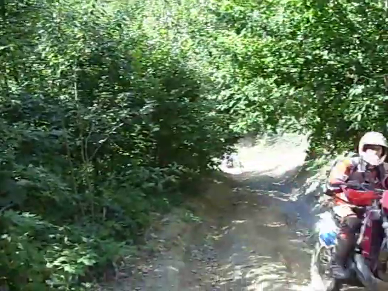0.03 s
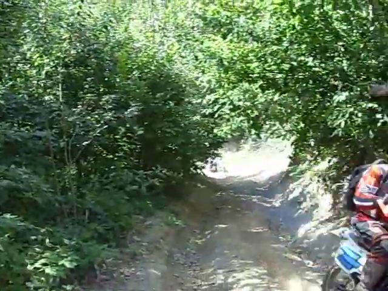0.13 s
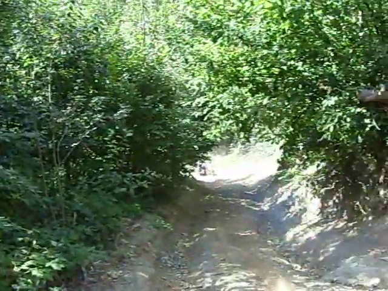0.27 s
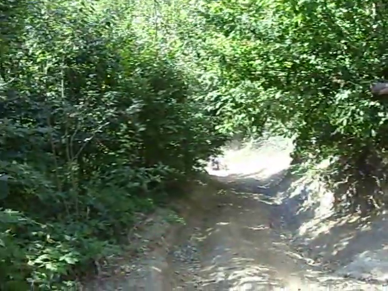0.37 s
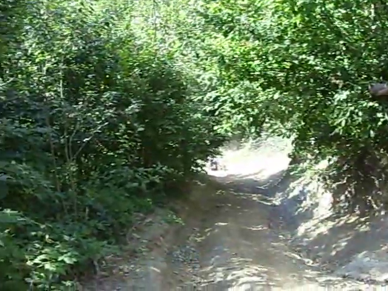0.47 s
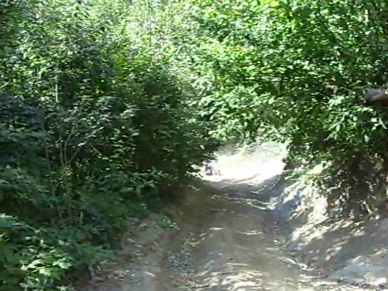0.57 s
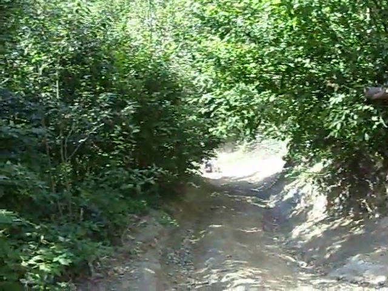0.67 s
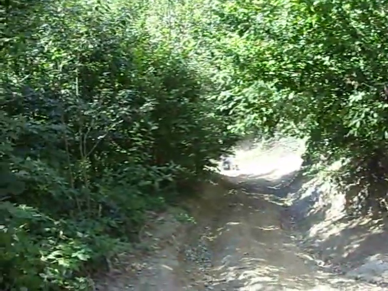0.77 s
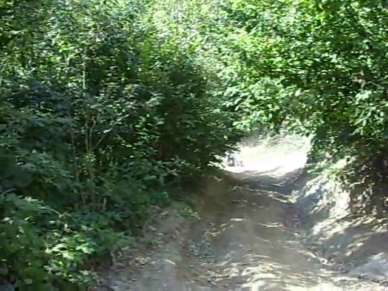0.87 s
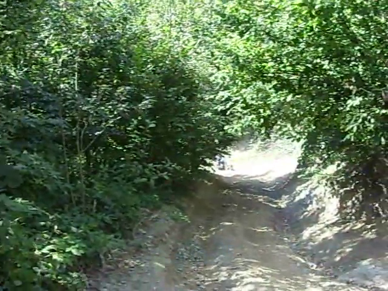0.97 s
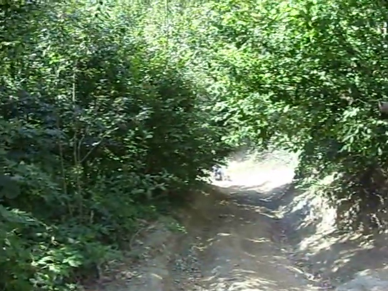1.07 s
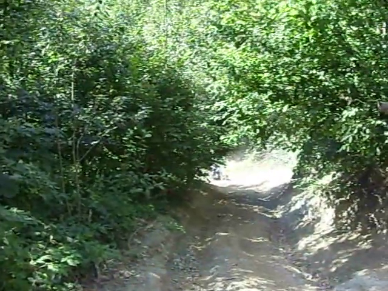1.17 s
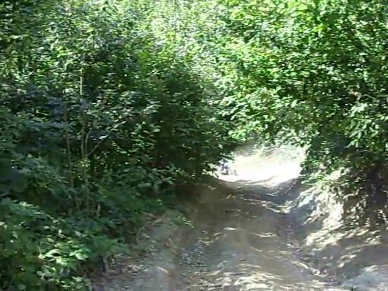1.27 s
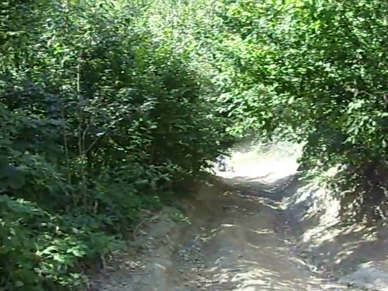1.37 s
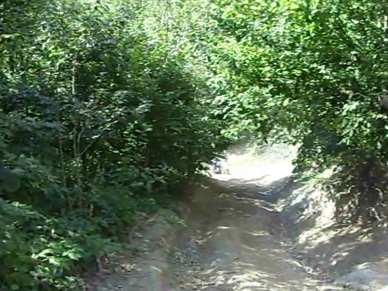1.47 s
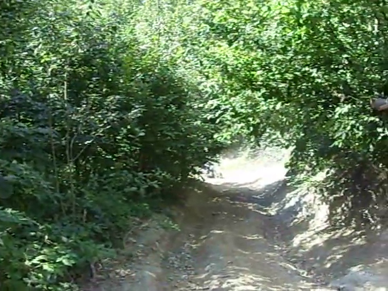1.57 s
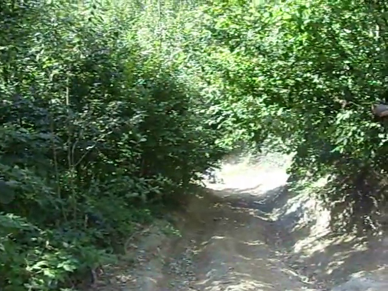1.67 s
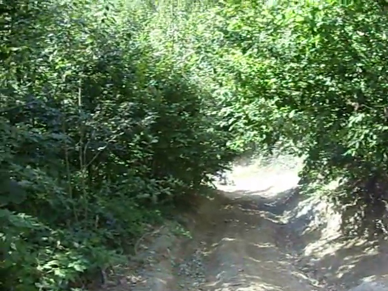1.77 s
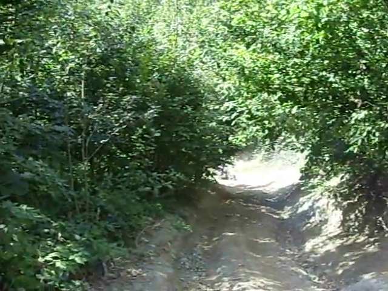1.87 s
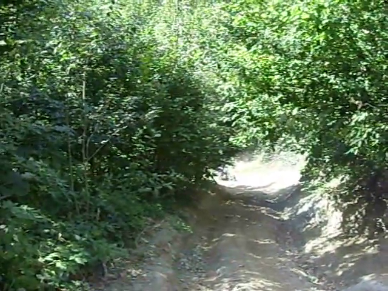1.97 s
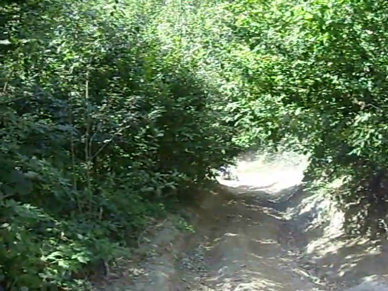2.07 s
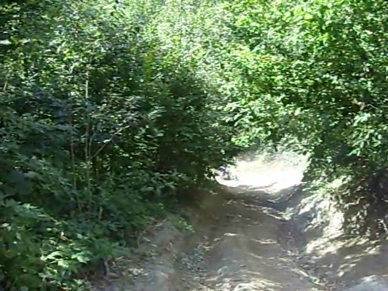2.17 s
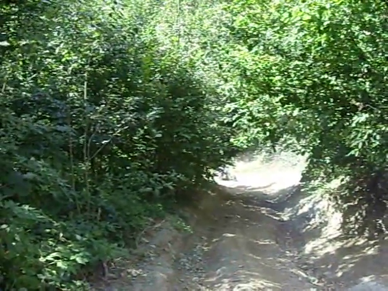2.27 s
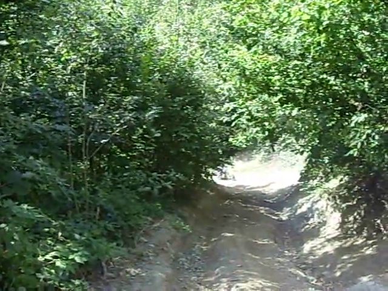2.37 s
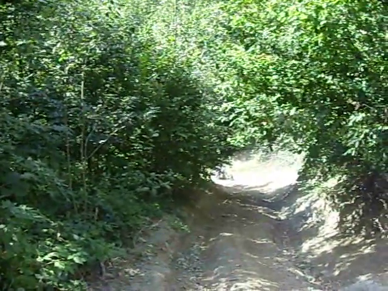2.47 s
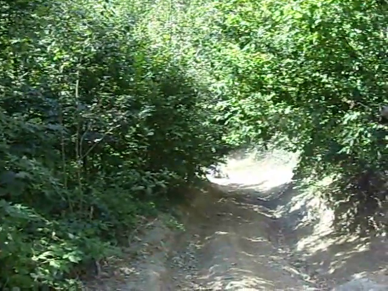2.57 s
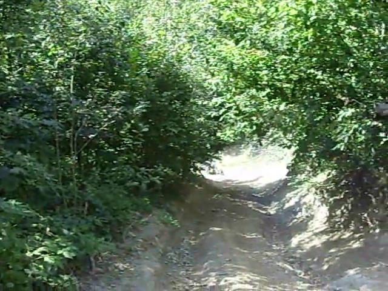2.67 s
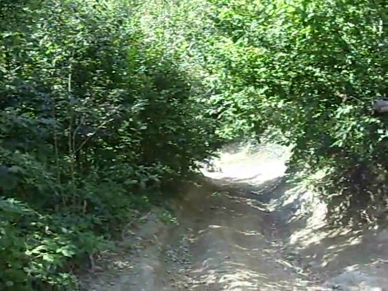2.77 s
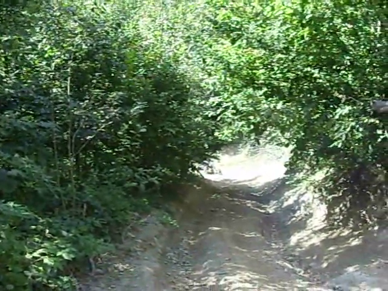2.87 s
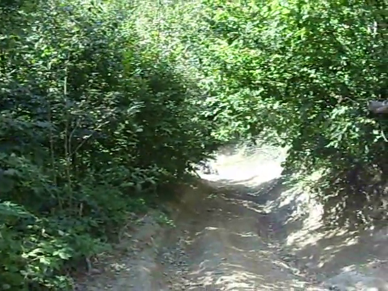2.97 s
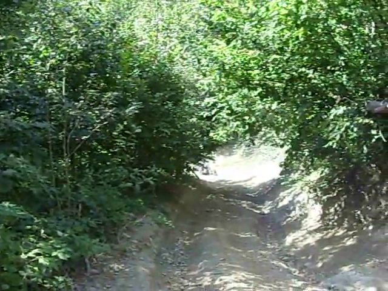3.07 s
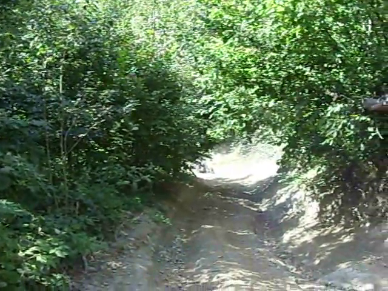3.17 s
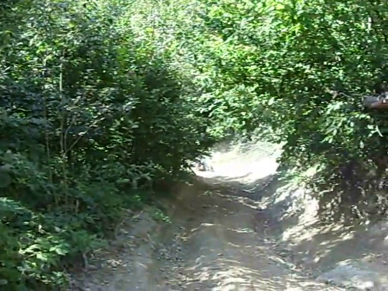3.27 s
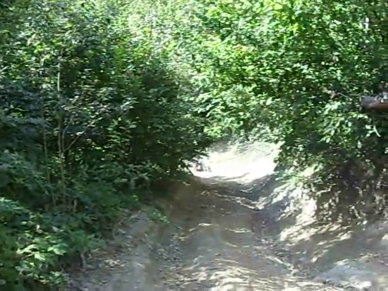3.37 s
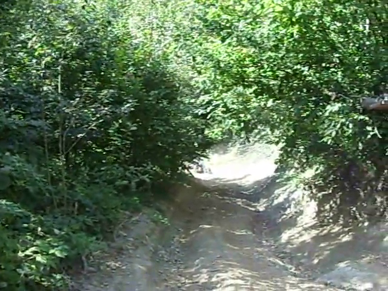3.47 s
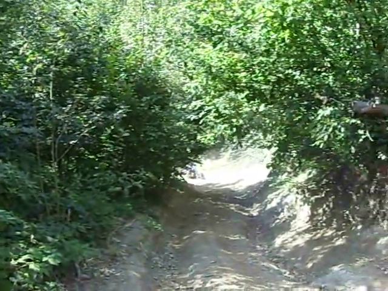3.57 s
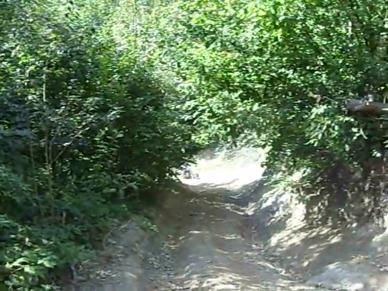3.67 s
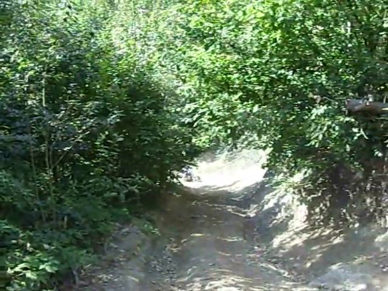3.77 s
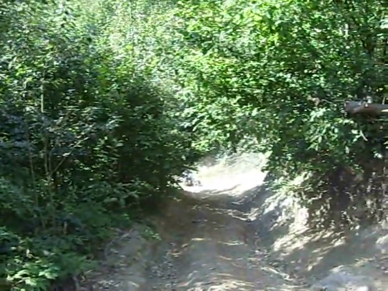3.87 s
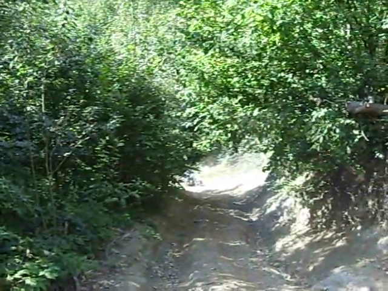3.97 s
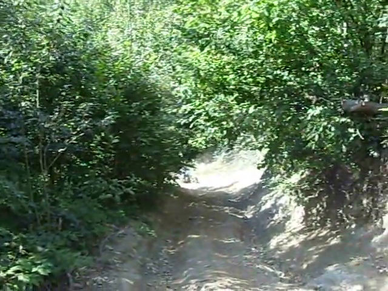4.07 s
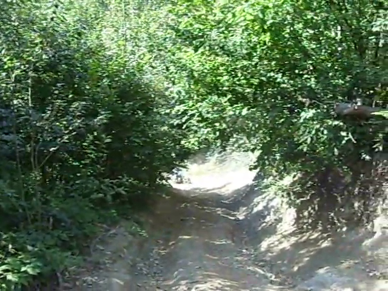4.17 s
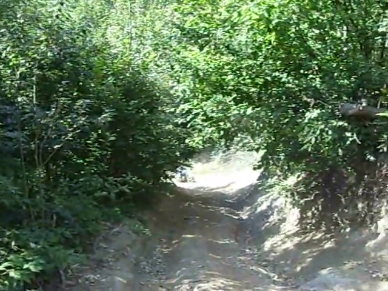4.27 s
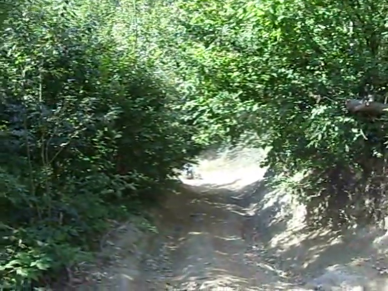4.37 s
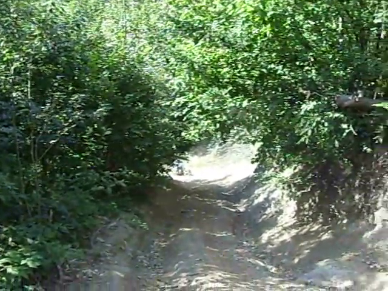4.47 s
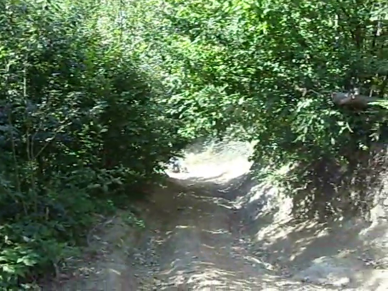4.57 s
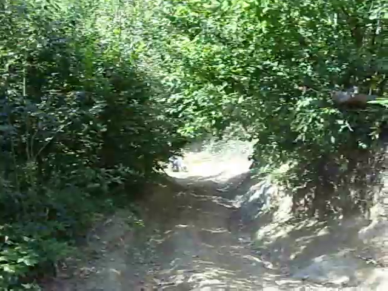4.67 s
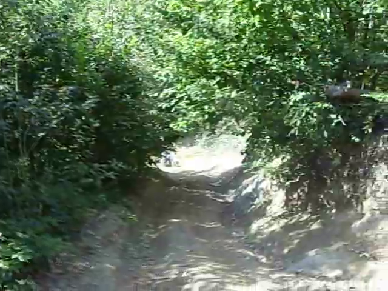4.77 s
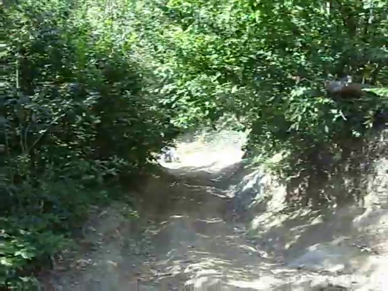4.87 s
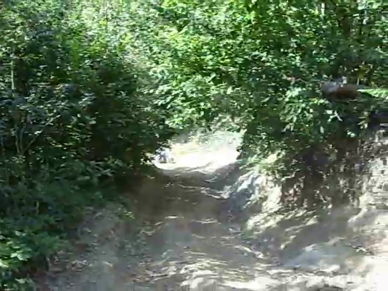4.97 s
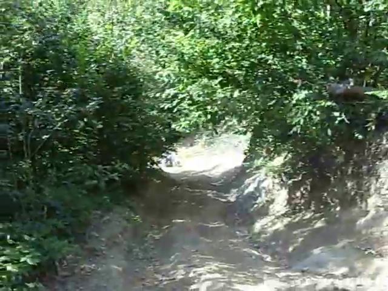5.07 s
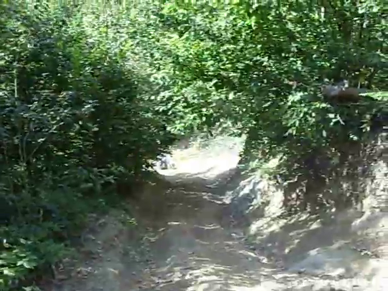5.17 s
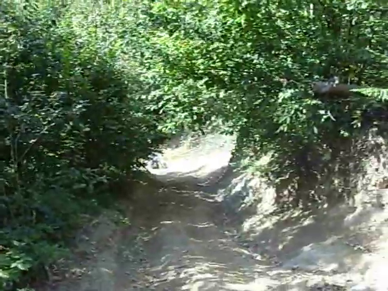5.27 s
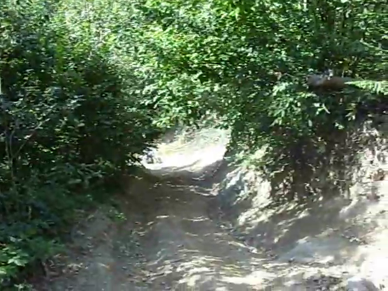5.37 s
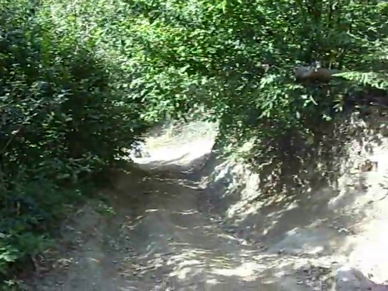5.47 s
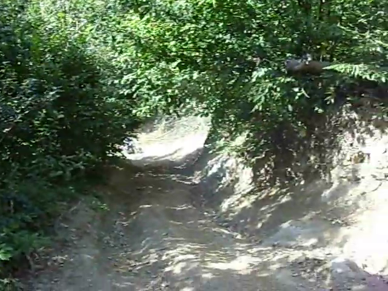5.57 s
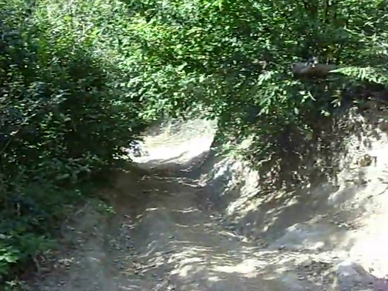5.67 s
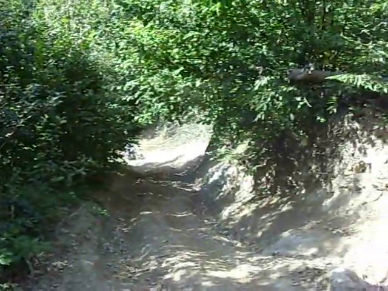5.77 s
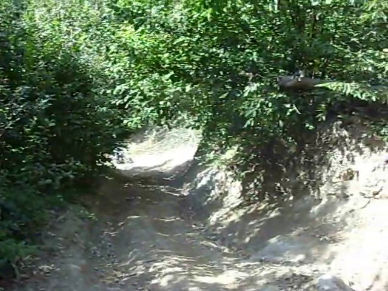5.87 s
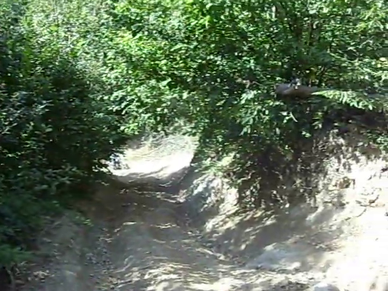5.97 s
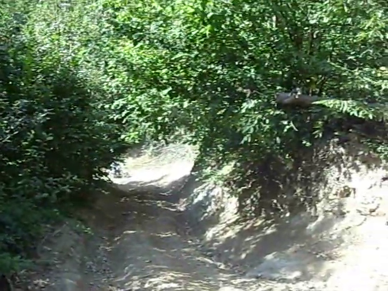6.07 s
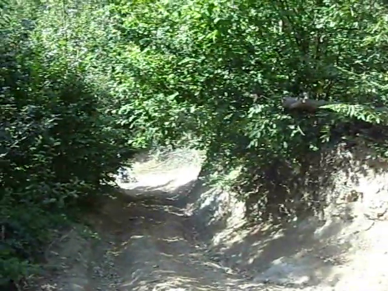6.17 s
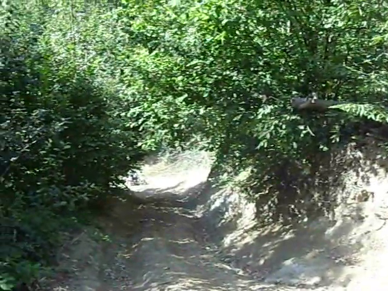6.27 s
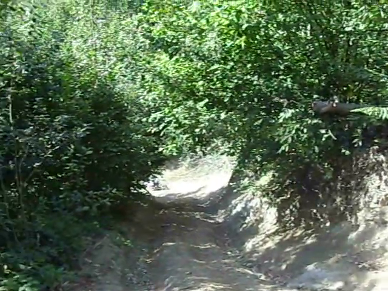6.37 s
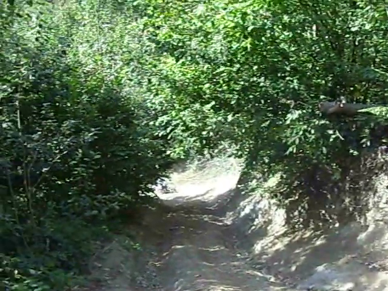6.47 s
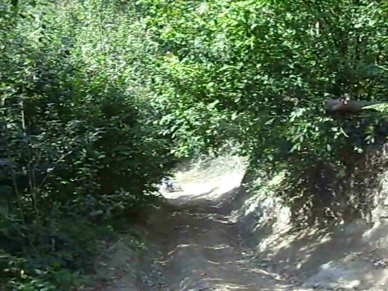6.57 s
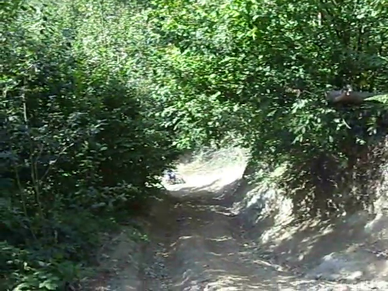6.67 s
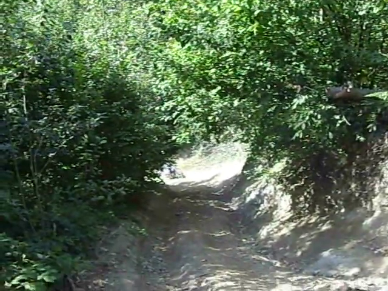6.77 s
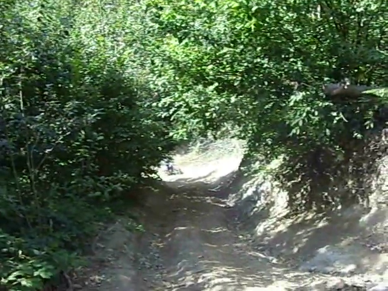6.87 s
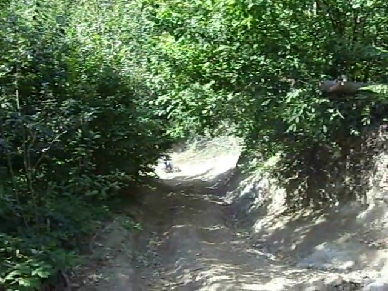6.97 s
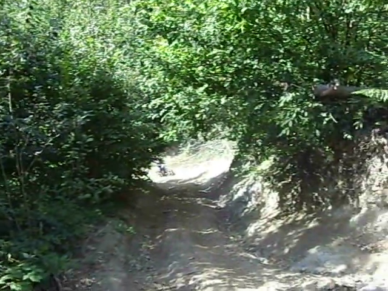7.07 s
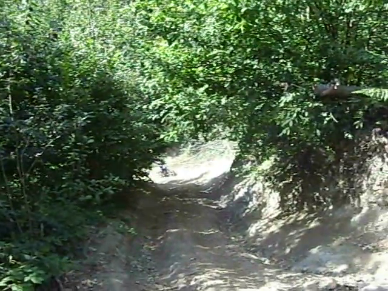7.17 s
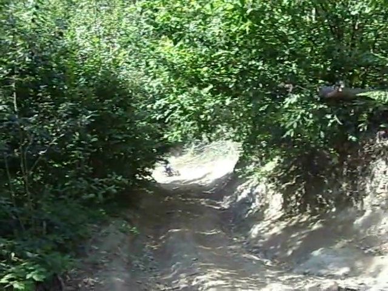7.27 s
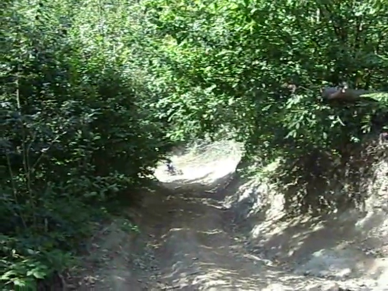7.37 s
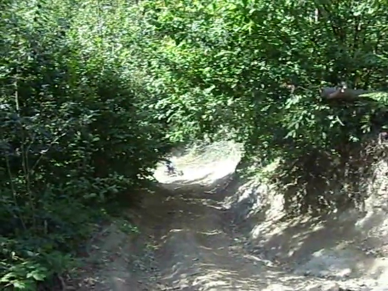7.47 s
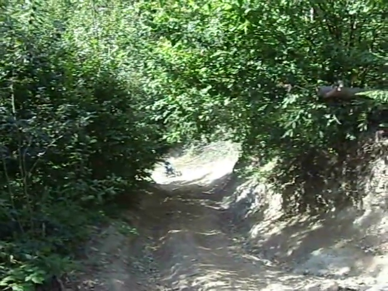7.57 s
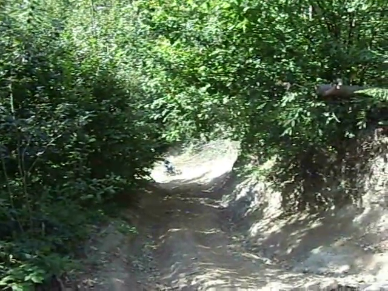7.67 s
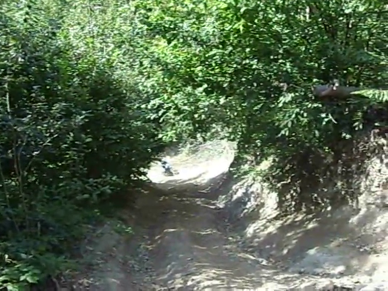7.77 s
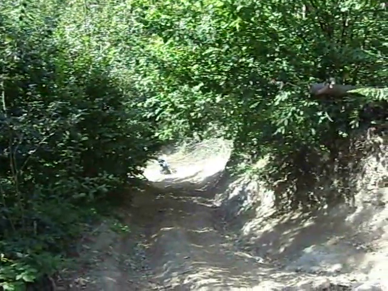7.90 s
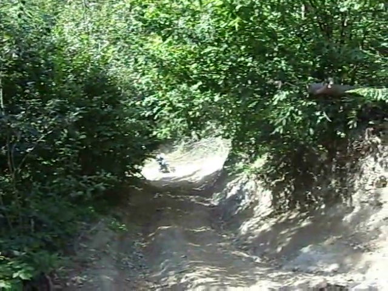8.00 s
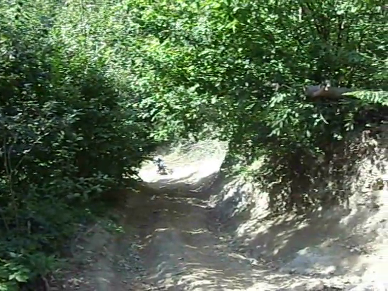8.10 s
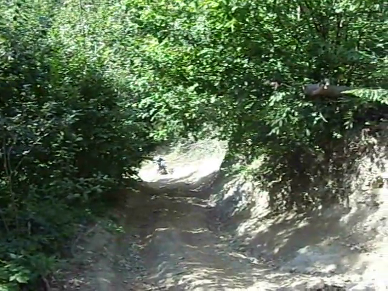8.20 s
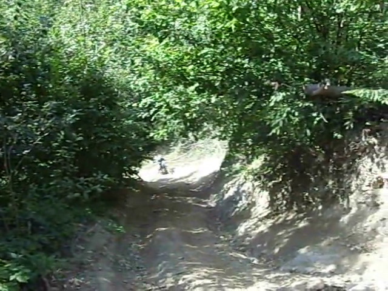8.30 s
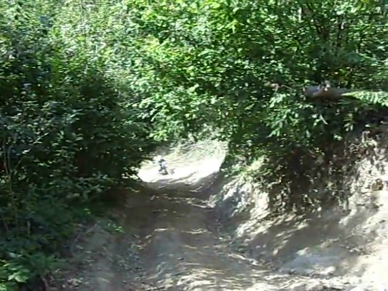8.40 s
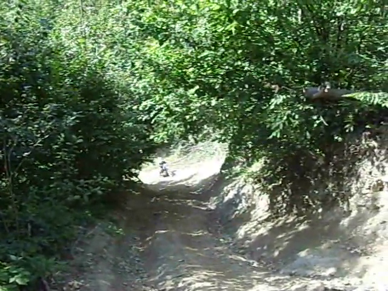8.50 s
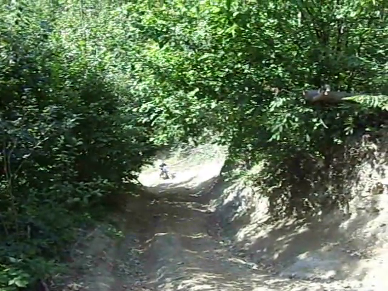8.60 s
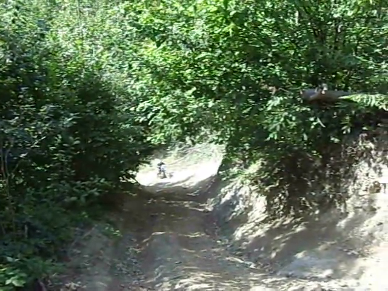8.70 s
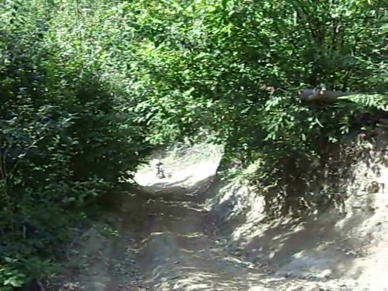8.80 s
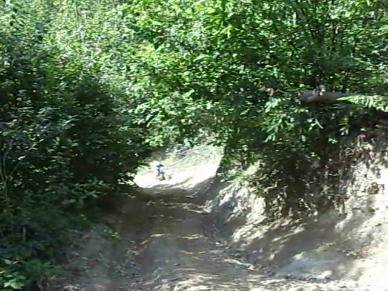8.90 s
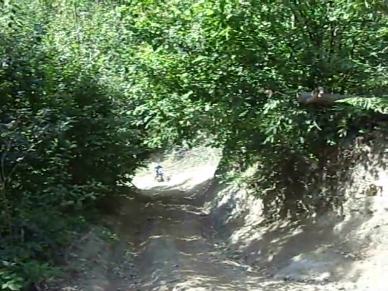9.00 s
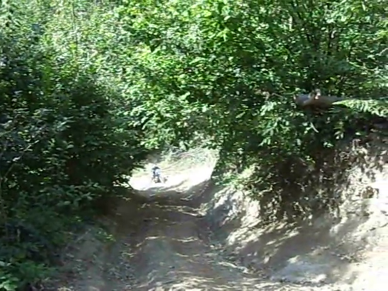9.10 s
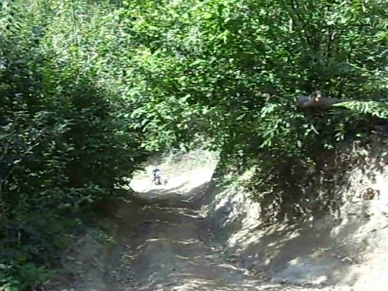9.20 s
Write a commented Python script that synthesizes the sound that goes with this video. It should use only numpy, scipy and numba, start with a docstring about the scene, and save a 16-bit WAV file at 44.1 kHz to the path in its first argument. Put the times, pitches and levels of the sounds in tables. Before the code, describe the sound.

A dirt bike roars past close, pops and putters away, then a second bike labours up the forest trail and drops to a lumpy idle.

```python
"""A single-cylinder dirt bike passes close on a wooded trail, shuts the throttle briefly, pulls away,
then coasts, pops and putters off. A second bike labours up from far away and drops to a lumpy idle.
Each firing of an engine makes the exhaust pipe ring and lets out a rasp of gas; trees scatter the sound.
Three dry clicks and a soft forest murmur join in, and the loudest peaks overload a small microphone."""
import sys
import numpy as np
from scipy import signal
from scipy.fft import rfft, irfft
from scipy.io import wavfile
from scipy.ndimage import uniform_filter1d
from numba import njit

SR = 44100
rng = np.random.default_rng(int(sys.argv[2]) if len(sys.argv) > 2 else 0)


def generate_wav(sig):
    """Save sig (samples, or channels by samples) to the path in sys.argv[1] as 16-bit PCM at SR."""
    pcm = np.round(np.clip(np.atleast_2d(sig).T, -1, 1) * 32767).astype(np.int16)
    wavfile.write(sys.argv[1], SR, pcm)


N = 407484
T = np.arange(N) / SR
COAST_S = 1.95  # about when the first bike starts to coast

# the first bike's twists of the throttle: (opens [s], shuts [s], opening [0-1])
FIRST_THROTTLE = [(-.2, .25, .87), (.25, .415, 1), (.575, 1.15, 1), (1.15, 1.4, .72), (1.4, 1.875, .82),
                  (3.78, 3.98, 1), (4.16, 5.2, .8)]
# tone of its gas rasp from behind: (pitch [Hz], level [dB])
RASP_FROM_BEHIND = [(760, -26), (1300, -44), (1340, -9), (1500, -17), (1590, -4.5), (1710, -3.5),
                    (1870, 0.5), (2420, -5), (2620, -9.5), (3550, 1), (3900, -6.5), (4390, -14.5),
                    (5160, -16.5), (5730, -22.5), (7450, -76.5), (12600, -120)]
# how its pipe rings at light throttle: (pitch [Hz], width [Hz], level [dB])
LIGHT_PIPE_RINGS = [(101, 29, 0.5), (272, 60, -6), (373, 24.4, 2.5), (606, 140, -12), (1000, 270, -36)]
# how the second bike's pipe rings at idle: (pitch [Hz], width [Hz], level [dB])
IDLE_PIPE_RINGS = [(112, 13, 7), (184, 21, 0.5), (283, 33, -2.5), (520, 79, -4), (768, 93, -12),
                   (1090, 265, -17)]
# the bright ring of its tailpipe: (pitch [Hz], width [Hz], level [dB])
TAILPIPE_RINGS = [(1710, 2240, -14.5), (2018, 150, 2.5), (2534, 110, -6.5), (3184, 270, -5.5),
                  (3640, 360, -10.5), (4270, 1500, -14.5)]
# tone of the hiss from chain and tyres: (pitch [Hz], level [dB])
HISS_TONE = [(710, -15), (1200, -49), (1440, -13), (1650, 2), (1950, 1.5), (2230, 1.5), (2530, -1),
             (3240, 3), (5030, -8.5), (5730, -12.5), (7450, -97), (12600, -120)]


def passing_bike():
    """The first bike rides by in a straight line, heard from the side and then from behind."""
    # engine speed while passing, then coasting: (time [s], firings per second [Hz])
    pass_rate = [(0.0, 83.6), (0.104, 79.9), (0.234, 80.3), (0.328, 84.8), (0.424, 83.7), (0.486, 67.8),
                 (0.57, 59.2), (0.638, 66.2), (0.696, 69.2), (0.852, 75.2), (0.936, 74.8), (1.004, 71.5),
                 (1.11, 69.1), (1.172, 71.6), (1.25, 67.5), (1.712, 81.3), (1.88, 77.3)]
    coast_rate = [(2.0, 61), (2.598, 46.1), (2.85, 42.5)]
    closest_s, closest_m, speed_m_s = .52, 2.5, 6.4
    nearness = closest_m / np.hypot(closest_m, speed_m_s * (T - closest_s))
    ground_lag_s = .002733 * nearness  # sound bouncing off the trail arrives this much later
    behind = ramp(.97, 1.81)  # the tailpipe swings round to face the microphone
    shut = 1 - throttle(FIRST_THROTTLE, travel_s=.04)
    coasting = np.clip(2 * shut - 1, 0, 1)
    boom_gain = nearness * undb(-18 - 11.5 * shut - 17.5 * behind)
    bark_gain = nearness * undb(-8.5 - 12.5 * shut - 2.4 * behind)
    rasp_gain = nearness * undb(-14 - 10.5 * shut + 7 * behind)
    fired = firings(np.vstack([pass_rate, coast_rate]), jitter_s=.00006, scatter_db=.9)
    fired = fired * undb(2.5 * coasting * noise())
    pipe = exhaust_note(fired, behind, coasting, ground_lag_s)
    boom = steady(band(pipe, 195, "low"), samples=1500) * np.maximum(boom_gain, undb(-43))
    bark = steady(band(pipe, 195, "high"), samples=1500) * bark_gain * (1 - ramp(2.3, 2.85))
    note = trees((boom + bark) * (1 - ramp(2.7, 2.95)), fade_s=.35, echo_db=-15)
    rasp = exhaust_rasp(fired, behind, coasting, ground_lag_s) * rasp_gain * (1 - ramp(1.837, 2))
    return note + trees(rasp, fade_s=.4, echo_db=-12)


def exhaust_note(fired, behind, coasting, ground_lag_s):
    """Pulses of gas ring the pipe; with the throttle shut, fuel burns unevenly and the note burbles."""
    # tone of the pipe from the side and from behind: (pitch [Hz], level [dB])
    side_tone = [(55, -23.5), (85, -7), (125, 6), (155, 2), (215, -3.5), (340, 1.5), (470, -1), (680, 0),
                 (850, -3.5), (1100, -8.5), (1500, -20), (2200, -44)]
    rear_tone = [(55, -40.5), (78, 31.5), (150, 6), (190, 0), (240, 3.5), (320, 9), (410, 3), (650, 4.5),
                 (950, -1.5), (1120, -4), (1350, -20), (2200, -35)]
    gas = fired + (.22 + .4 * coasting) * puff(fired, decay_s=.008)
    gas = chamber(gas, lag_s=.001321, share=.78)
    gas = chamber(gas, lag_s=.0031, share=.66)
    pipe = (1 - behind) * colour(gas, side_tone) + behind * colour(gas, rear_tone)
    pipe = pipe + .38 * echo(pipe, ground_lag_s)
    honk_hz = np.minimum(1 / ground_lag_s, 562)  # climbs with the ground bounce just after the pass
    honk = resonance(pipe, honk_hz, width_hz=92.) * ramp(.55, 1) * (1 - ramp(.886, 1.46))
    hollow_hz = 370 - 110 * np.clip(T - COAST_S, 0, 1)  # a hollow ring sinks as the bike coasts
    hollow = resonance(pipe, hollow_hz, width_hz=36.) * (ramp(COAST_S, 2.05) - ramp(2.1, 2.55))
    return pipe + undb(9.5) * honk + undb(6.5) * hollow


def exhaust_rasp(fired, behind, coasting, ground_lag_s):
    """Escaping gas steepens into shock waves of uneven strength, sharpest from behind."""
    # tone of the rasp from the side: (pitch [Hz], level [dB])
    side_tone = [(650, -29), (1100, -4.5), (1360, -4), (1850, 2), (2300, 0), (4060, -2), (4760, -7.5),
                 (5310, -6), (5730, -16.5), (7450, -69), (12600, -120)]
    # its bright ring from the front: (pitch [Hz], width [Hz], level [dB])
    front_ring = [(3230, 3100, 2.5)]
    shock = fired * undb(noise())
    alternating = (-1) ** np.cumsum(fired != 0)  # heard from behind, every second firing is stronger
    shock = shock * undb(1.8 * behind * alternating)
    blast = (.67 + .5 * behind) * shock + behind * puff(shock, decay_s=.0022)
    blast = blast + (1 - behind / 2) * puff(shock, decay_s=.0077) + .78 * puff(fired, decay_s=.0088)
    blast = (1 - coasting) * blast + coasting * puff(fired, decay_s=.02)
    blast = blast + .3 * echo(blast, ground_lag_s)
    blast = blast + ring(blast, front_ring) * (1 - ramp(.54, .541))
    rear = ramp(.89, 1.07)
    rasp = (1 - rear) * colour(blast, side_tone) + rear * colour(blast, RASP_FROM_BEHIND)
    return steady(rasp, samples=1500)


def departing_bike():
    """The first bike pops, then putters out of earshot as its chain and tyre hiss dies down."""
    # engine speed: (time [s], firings per second [Hz])
    away_rate = [(3.524, 39.33), (3.65, 40.59), (3.75, 44.38), (3.95, 45.37), (4.13, 40.12), (4.38, 50.2),
                 (4.7, 45.67), (4.95, 50.53), (5.45, 49.49)]
    pops = exhaust_pops()
    fired = firings(away_rate, jitter_s=.0001, scatter_db=1.2)
    shock = fired * undb(1.5 * noise())
    shut = 1 - throttle(FIRST_THROTTLE, travel_s=.1)
    ticks = colour(shock + puff(shock, decay_s=.0043), RASP_FROM_BEHIND)
    ticks = steady(ticks, samples=6000) * undb(-46 - 4.5 * shut)
    putter = steady(ring(fired, LIGHT_PIPE_RINGS), samples=6000) * undb(-43.5)
    hiss_db = -51 + 14 * np.exp(-np.maximum(T - COAST_S, 0) / .55)
    hiss = unit(colour(noise(), HISS_TONE)) * undb(hiss_db) * ramp(1.52, COAST_S)
    in_earshot = 1 - ramp(4.74, 5.95)
    return (trees(pops + ticks, fade_s=.44, echo_db=-9) + putter + hiss) * in_earshot


def exhaust_pops():
    """With the throttle shut, the exhaust pops: each pop is a sharp crack and a thud of the pipe."""
    # the pops: (time [s], relative strength [dB])
    pop_list = [(2.8559, -27), (2.8993, -16), (2.9377, -18), (2.9731, -17), (2.9901, -18), (3.022, -14),
                (3.038, -15), (3.0874, -23), (3.1453, -20), (3.2131, -17), (3.2605, -18), (3.3069, -16.5),
                (3.3533, -15), (3.4007, -27), (3.4491, -27)]
    times, strength_db = np.transpose(pop_list)
    pops = pulses(times, undb(strength_db))
    crack = colour(pops + .82 * puff(pops, decay_s=.003), RASP_FROM_BEHIND)
    crack = crack + ring(crack, [(3150, 900, 2)])
    thud = ring(pops + .76 * puff(pops, decay_s=.011), LIGHT_PIPE_RINGS[1:])
    hollow_silencer = ring(puff(pops, decay_s=.016), [(242, 83, -5), (520, 98, -9)])
    return undb(18) * crack + undb(31.5) * (thud + hollow_silencer)


def climbing_bike():
    """The second bike fires slowly, dull while far off and sharper as it comes nearer."""
    # engine speed: (time [s], firings per second [Hz])
    climb_rate = [(2.0, 28.64), (3.5, 29.0), (4.5, 30.56), (4.75, 30.5), (5.0, 27.31), (5.25, 26.49),
                  (5.6, 28.95), (5.9, 29.13), (6.15, 33.46), (6.35, 32.43), (6.6, 29.52), (6.8, 25.08),
                  (7.15, 25.49), (7.35, 22.62), (7.55, 21.55), (7.8, 20.7), (8.0, 21.48), (8.3, 20.58)]
    # twists of the throttle: (opens [s], shuts [s], opening [0-1])
    twists = [(4.5, 6.43, 0.83), (6.7, 8.4, 1)]
    # when the engine misses a firing: (time [s])
    misses = [7.61]
    # how the pipe rings under load: (pitch [Hz], width [Hz], level [dB])
    load_rings = [(35, 27, -1.5), (117.6, 18.6, 8), (315.3, 39, 1), (650, 52, 2.5), (740, 105, -3),
                  (1146, 92, -11)]
    load_rate_hz, idle_rate_hz = 31.1, 20.4
    rate = curve(climb_rate)
    extra_hz = rate - load_rate_hz
    # a faster engine heats the pipe, so it rings higher
    load_stretch, idle_stretch = (rate / load_rate_hz) ** .25, (rate / idle_rate_hz) ** .25
    shut = 1 - throttle(twists, travel_s=.31)
    idle = ramp(6.4, 6.95)
    strain = ramp(5.3, 5.4) * (1 - idle)  # the steepest part of the climb
    fired = firings(climb_rate, jitter_s=.0001, scatter_db=.8)
    for miss in misses:
        fired = fired * (np.abs(T - miss) > .02)
    gas = chamber(fired + .17 * puff(fired, decay_s=.008), lag_s=.0023, share=.3)
    bank_bounce = .5 * echo(gas, lag_s=.006624)  # off an earth bank
    loaded = ring(gas + bank_bounce, load_rings, load_stretch)
    idling = ring(gas + .58 * echo(gas, lag_s=.0089), IDLE_PIPE_RINGS, idle_stretch)
    pipe = (1 - idle) * loaded - idle * idling
    # one ring of the pipe drones as the bike tops the climb
    drone = band(ring(-gas, load_rings[1:2], load_stretch), 212, "high")
    drone = steady(drone, samples=6000) * undb(-48.5) * (ramp(5.85, 6.35) - ramp(6.55, 7.7))
    boom = steady(band(pipe, 127, "low"), samples=6000) * undb(-42.5 - 3.5 * strain)
    bark = steady(band(pipe, 208, "high"), samples=6000) * undb(-38.5 - 6.5 * shut + .4 * extra_hz)
    note = trees((boom + bark + drone) * ramp(2.2, 2.7), fade_s=.4, echo_db=-16)
    distance_db = 4.5 * np.minimum(T - 8.14, 0)  # rises until the bike arrives
    crack = ring(.45 * fired + puff(fired, decay_s=.008), TAILPIPE_RINGS)
    crack = steady(crack, samples=6000) * undb(-41 - 8.5 * shut + .55 * extra_hz + distance_db)
    valve_rattle = unit(ring(puff(fired, decay_s=.0063), [(4400, 260, 0)])) * undb(-59.5)
    hiss = unit(colour(noise(), HISS_TONE)) * undb(-54)
    machinery = (valve_rattle + hiss) * strain * (1 - shut)
    return note + trees(crack + machinery, fade_s=.31, echo_db=-6.5)


def idle_thumps():
    """At idle the second bike fires on only some cycles, so each thump stands alone."""
    # the thumps: (time [s], relative strength [dB])
    thumps = [(8.372, -20), (8.468, -20.5), (8.575, -21.5), (8.628, -19.5), (8.676, -22.5), (8.725, -20.5),
              (8.773, -20), (8.867, -17.5), (8.961, -18), (9.065, -20), (9.174, -19)]
    times, strength_db = np.transpose(thumps)
    fired = -pulses(times, undb(strength_db))
    body = ring(fired + .46 * puff(fired, decay_s=.015), IDLE_PIPE_RINGS)
    crack = ring(.31 * fired + puff(fired, decay_s=.0073), TAILPIPE_RINGS)
    middle = ring(puff(fired, decay_s=.006), [(550, 98, -8.5)])  # brought out by the harder blow
    return trees(undb(35.5) * (body + middle) + undb(28) * crack, fade_s=.44, echo_db=-7)


def firings(rate, jitter_s, scatter_db):
    """One pulse per engine cycle, each a little off in time and strength."""
    running = (T >= rate[0][0]) & (T <= rate[-1][0])
    cycles = np.cumsum(curve(rate) * running) / SR
    times = T[np.diff(np.ceil(cycles), prepend=0) > 0]
    chance = rng.standard_normal((len(times), 2))
    return pulses(times + jitter_s * chance[:, 0], undb(scatter_db * chance[:, 1]))


def throttle(twists, travel_s):
    """How far the throttle is open: each twist opens, holds and shuts."""
    return sum(opening * (ramp(opens, opens + travel_s) - ramp(shuts, shuts + travel_s))
               for opens, shuts, opening in twists)


def puff(fired, decay_s):
    """A burst of swirling gas after each pulse, with the pulse's energy."""
    keep = np.exp(-1 / (decay_s * SR))
    return signal.lfilter([np.sqrt(1 - keep ** 2)], [1, -keep], fired) * noise()


def chamber(x, lag_s, share):
    """A silencer chamber: repeated bounces spread each pulse out without changing its tone."""
    feedback = np.r_[1, np.zeros(int(lag_s * SR)), share]
    return signal.lfilter(feedback[::-1], feedback, x)


def clicks():
    """Short dry snaps near the microphone, like a twig breaking."""
    # the snaps: (time [s], peak [dB], pitch [Hz], width [Hz], decay [s])
    snaps = [(5.133, -17, 1160, 900, 0.00097), (5.2622, -8.5, 4900, 1480, 0.0006),
             (6.306, -24.5, 3900, 2520, .001)]
    out = np.zeros(N)
    for time, peak_db, hz, width, decay_s in snaps:
        hit = pulses([time], 1)
        burst = hit + 1.1 * puff(hit, decay_s) + .25 * puff(hit, decay_s=.0034)
        snap = ring(burst, [(hz, width, 0), (2500, 600, -8)])
        out += undb(peak_db) * snap / np.abs(snap).max()
    return out


def trees(x, fade_s, echo_db):
    """Trunks and leaves add a blur of echoes that falls by 60 dB in fade_s."""
    t = T[:SR]
    tail = rng.standard_normal(SR) * undb(-60 * t / fade_s) * np.minimum(t / .012, 1)
    return x + undb(echo_db) * signal.fftconvolve(x, tail / np.linalg.norm(tail))[:N]


def woods():
    """Forest air and distant engines murmur softly, with a deep wavering hum."""
    # tone of the murmur: (pitch [Hz], level [dB])
    murmur_tone = [(12, -57), (30, -1), (50, -14.5), (75, -5), (120, -11), (200, -9.5), (500, -14.5),
                   (950, -16), (1350, -29), (2000, -28.5), (4300, -31.5), (5700, -40.5), (7500, -83)]
    hum = unit(resonance(noise(), np.full(N, 30.), width_hz=3.9)) * undb(-61.5)
    return unit(colour(noise(), murmur_tone)) * undb(-42.5) + hum


def ring(x, rings, stretch=1):
    """Add up rings of (pitch [Hz], width [Hz], level [dB]), flipping every other; stretch scales pitch."""
    return sum((-1) ** k * undb(db) * resonance(x, np.full(N, float(hz)) * stretch, float(width))
               for k, (hz, width, db) in enumerate(rings))


@njit
def resonance(x, hz, width_hz):
    """Let through only the sound near one pitch, which may glide."""
    out, band_state, low_state = np.empty(len(x)), 0., 0.
    for i in range(len(x)):
        tuning, damping = np.tan(np.pi * hz[i] / SR), width_hz / hz[i]
        swing = (band_state + tuning * (x[i] + 1e-18 - low_state)) / (1 + tuning * (tuning + damping))
        band_state = 2 * swing - band_state
        low_state += 2 * tuning * swing
        out[i] = damping * swing
    return out


def colour(x, tone, size=4096):
    """Shape a sound to an outline of (pitch [Hz], level [dB])."""
    hz, db = np.transpose(tone)
    grid = np.maximum(np.arange(size // 2 + 1) * SR / size, 1)
    gain = undb(np.interp(np.log(grid), np.log(hz), db))
    cepstrum = irfft(np.log(gain))
    # fold it so that the filter rings after a pulse, never before
    cepstrum[1:size // 2] *= 2
    cepstrum[size // 2 + 1:] = 0
    return signal.fftconvolve(x, irfft(np.exp(rfft(cepstrum))))[:N]


def band(x, hz, kind, order=4):
    """Keep the "low" or the "high" side of a pitch."""
    return signal.sosfilt(signal.butter(order, hz, kind, fs=SR, output="sos"), x)


def steady(x, samples):
    """Hold the running level near 1, leaving single firings intact."""
    power = uniform_filter1d(uniform_filter1d(x * x, samples), samples)
    return x / np.sqrt(np.abs(power) + np.mean(x * x) / 20)


def echo(x, lag_s):
    """The same sound a little later."""
    return np.interp(T - lag_s, T, x, left=0)


def pulses(times, sizes):
    """One spike at each time."""
    out = np.zeros(N)
    np.add.at(out, np.clip(np.asarray(times) * SR, 0, N - 1).astype(int), sizes)
    return out


def curve(table):
    """Join rows of (time [s], value) with straight lines."""
    return np.interp(T, *np.transpose(table))


def ramp(start_s, end_s):
    """Rise from 0 to 1 between two times."""
    return np.clip((T - start_s) / (end_s - start_s), 0, 1)


def noise():
    """White noise: an even hiss."""
    return rng.standard_normal(N)


def unit(x):
    """Scale to an average (rms) level of 1."""
    return x / np.std(x)


def undb(db):
    """Turn decibels into a multiplier."""
    return 10 ** (np.asarray(db) / 20)


def scene():
    """Both bikes, the clicks and the woods at one microphone."""
    return (passing_bike() + departing_bike() + climbing_bike() + idle_thumps() + clicks() + woods())[None]


def record(dry):
    """A small microphone loses the high treble and flattens the loudest peaks."""
    mic_top_hz, overload, final_top_hz = 5650, .72, 15900
    dulled = band(dry, mic_top_hz, "low", order=18)
    flattened = np.clip(dulled, -overload, overload)
    return signal.sosfilt(signal.ellip(8, .2, 70, final_top_hz, fs=SR, output="sos"), flattened)


dry = scene()
out = record(dry)
generate_wav(out)
```